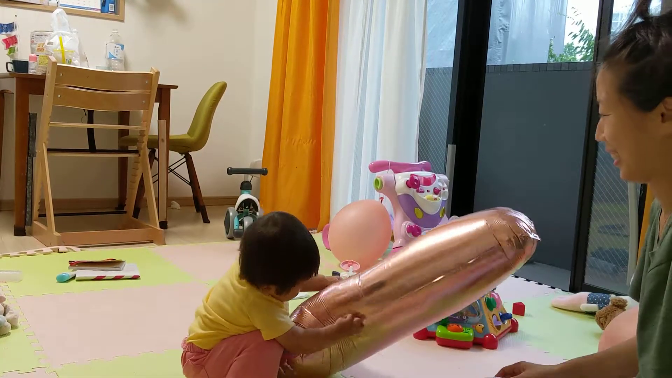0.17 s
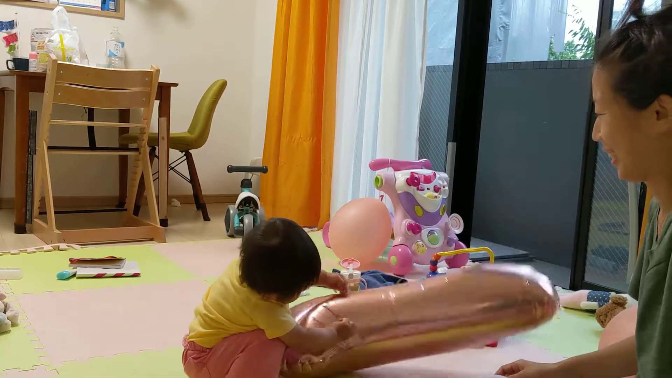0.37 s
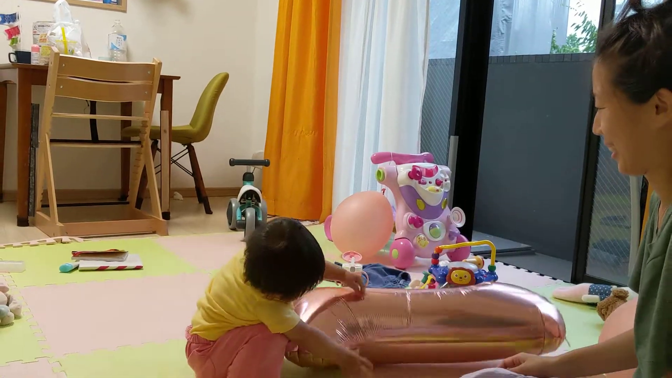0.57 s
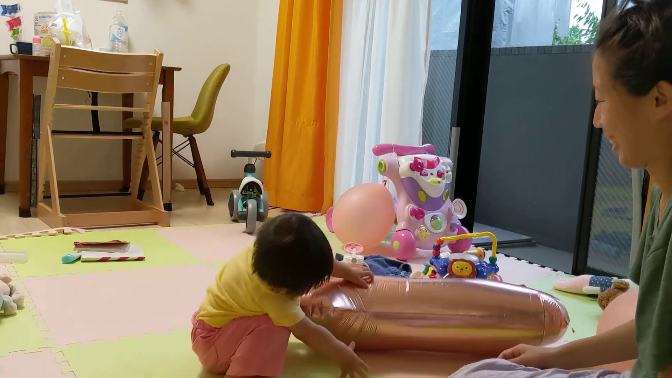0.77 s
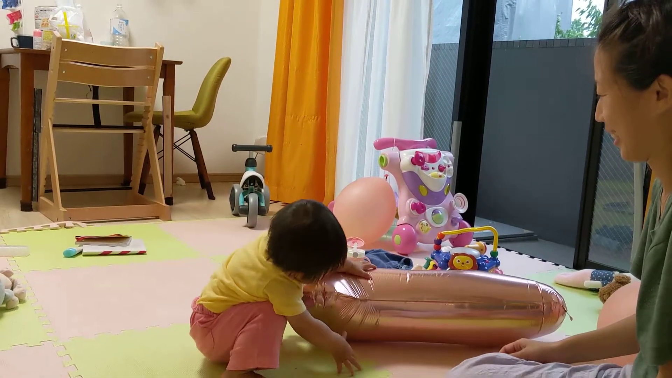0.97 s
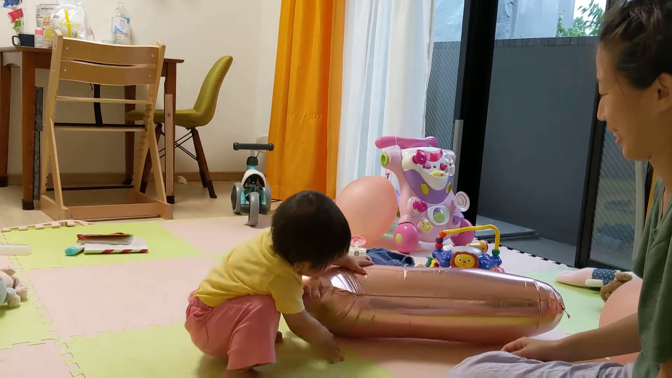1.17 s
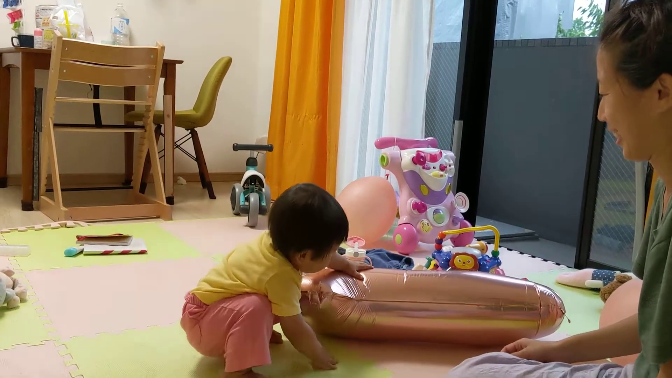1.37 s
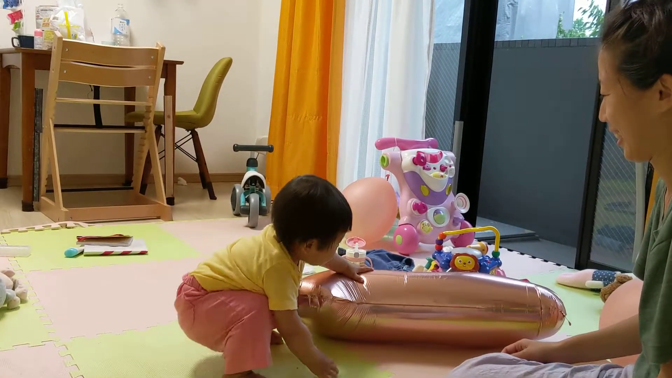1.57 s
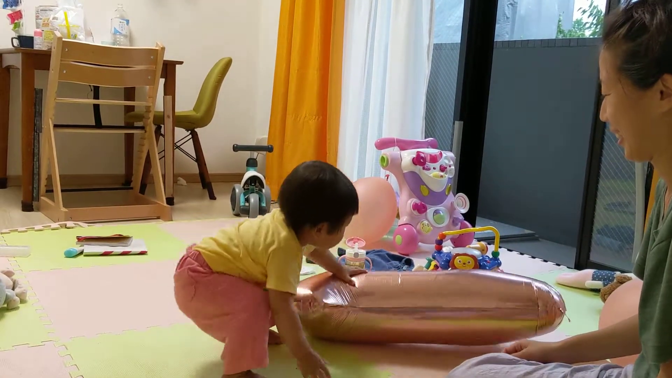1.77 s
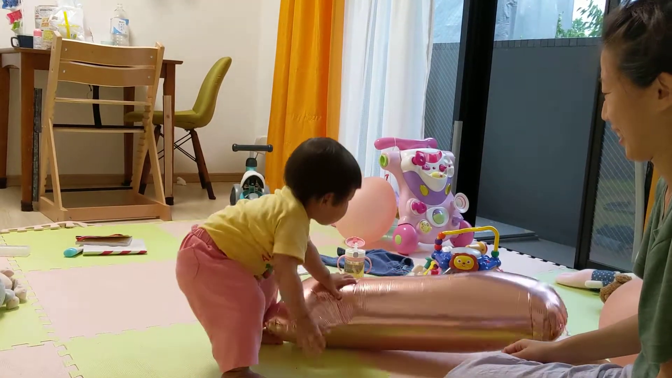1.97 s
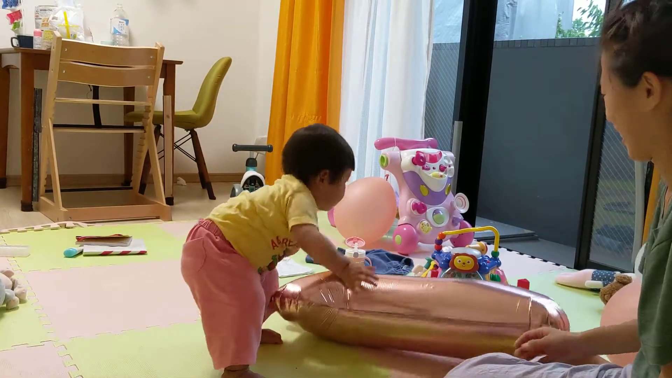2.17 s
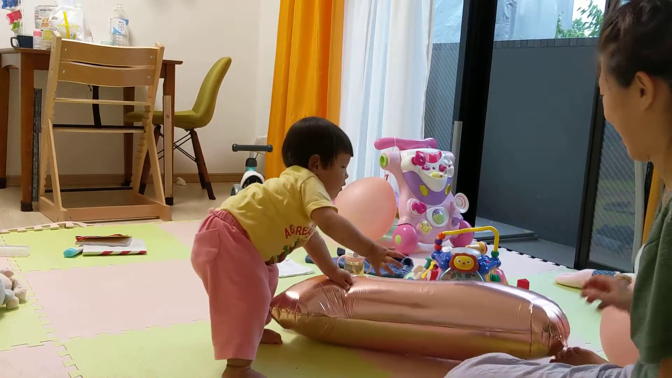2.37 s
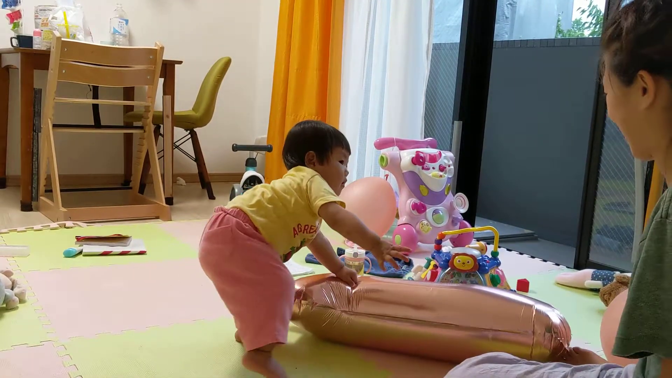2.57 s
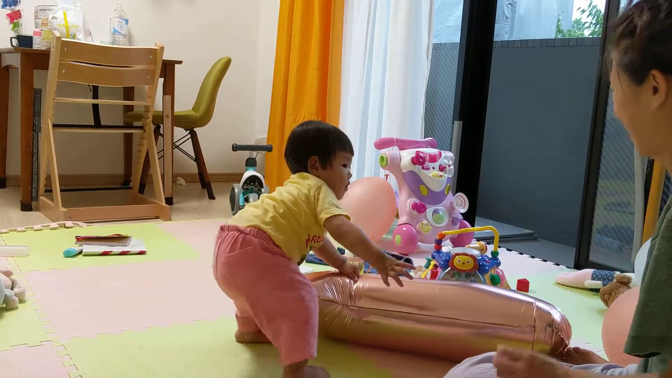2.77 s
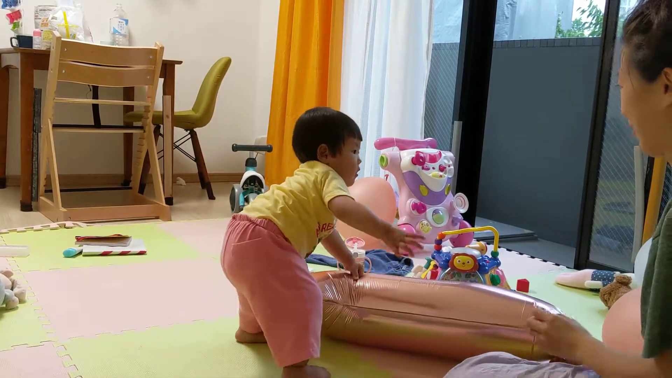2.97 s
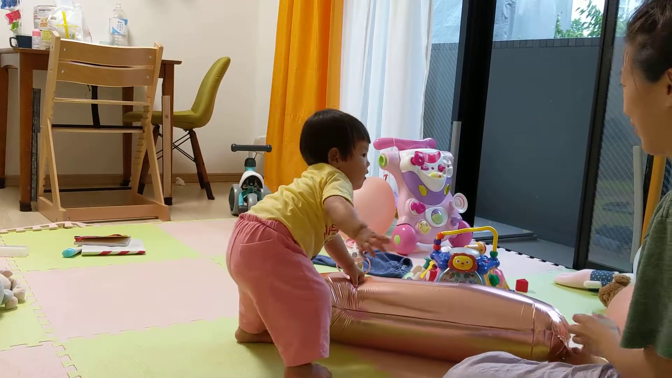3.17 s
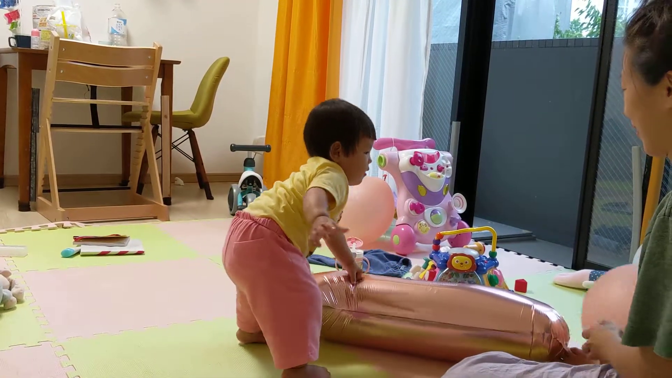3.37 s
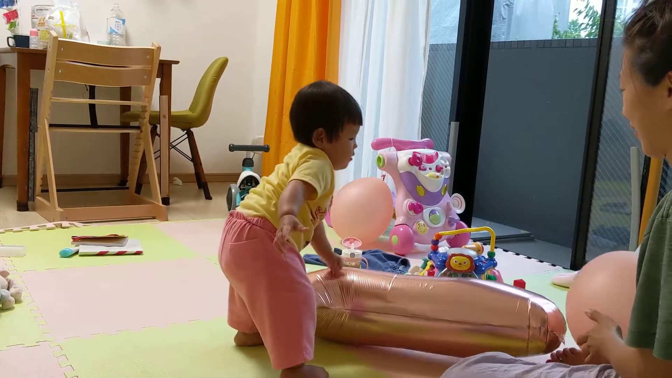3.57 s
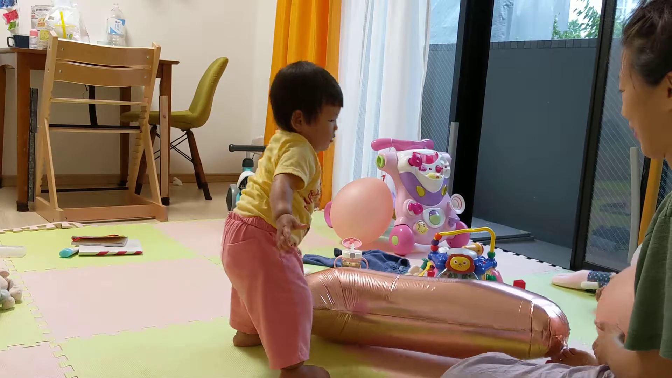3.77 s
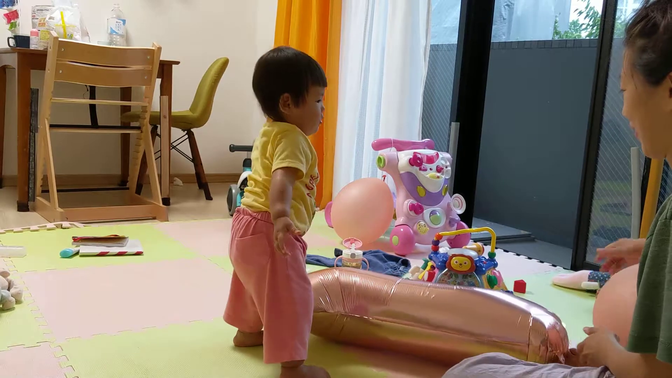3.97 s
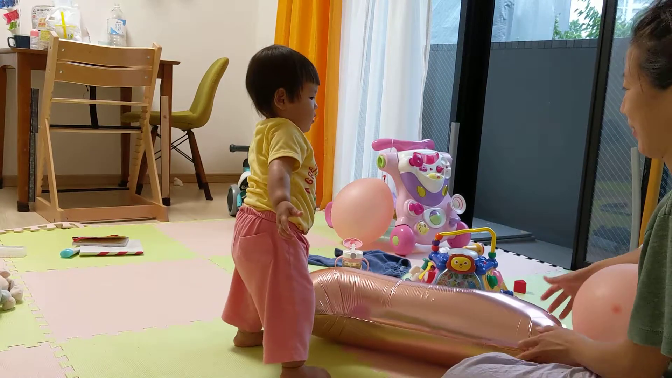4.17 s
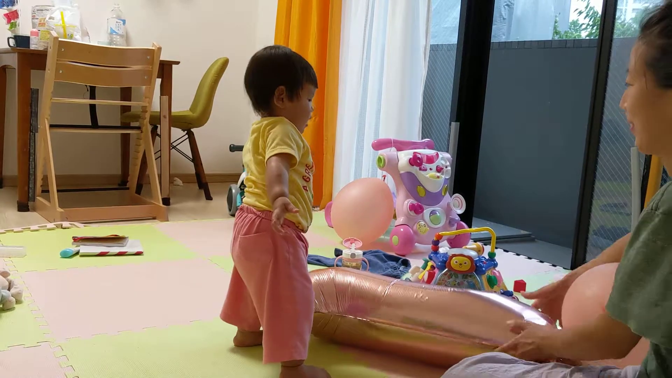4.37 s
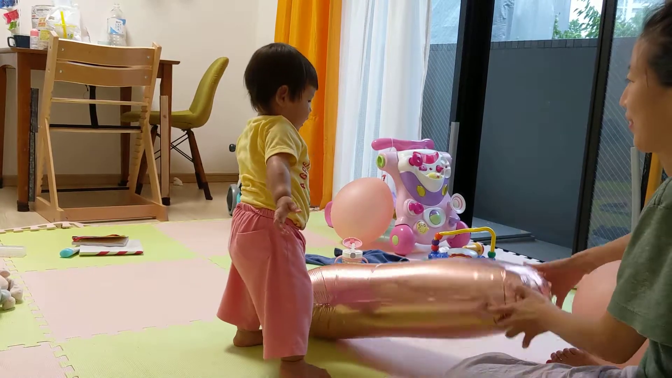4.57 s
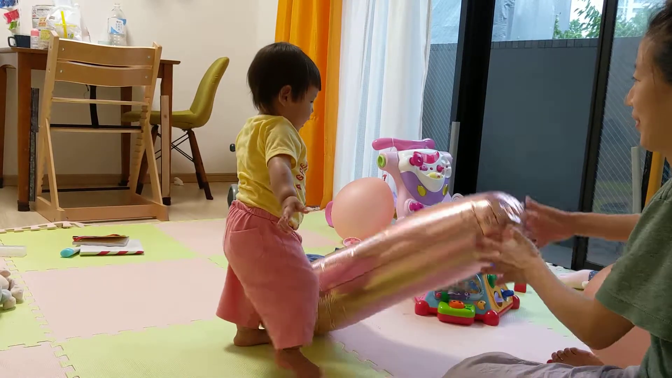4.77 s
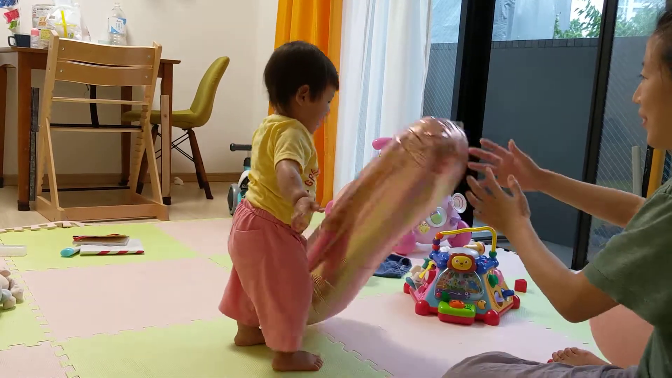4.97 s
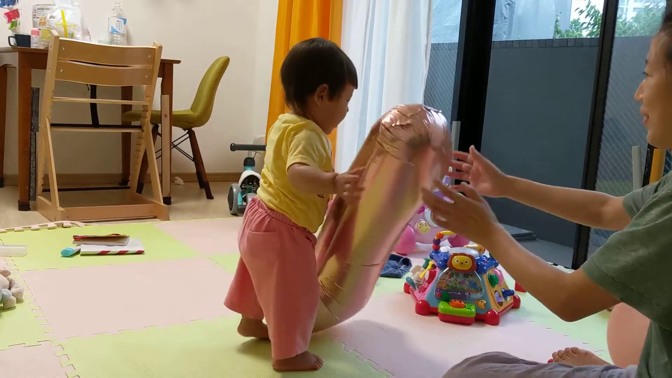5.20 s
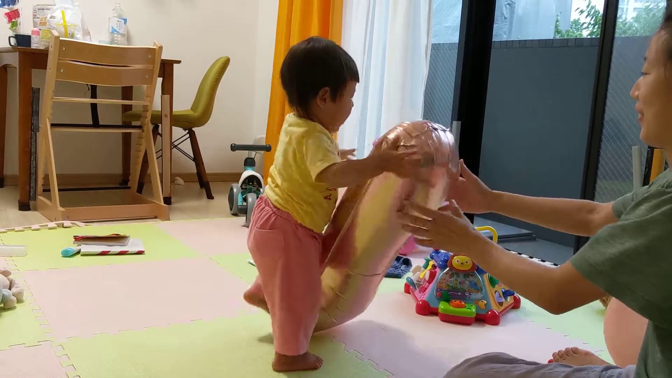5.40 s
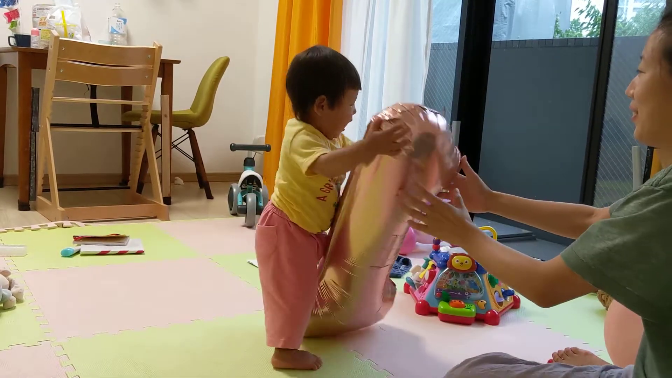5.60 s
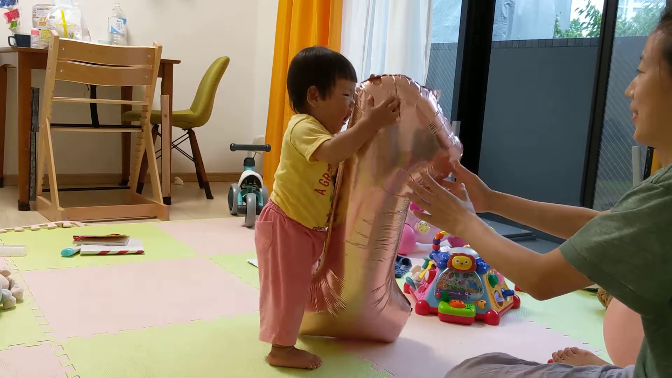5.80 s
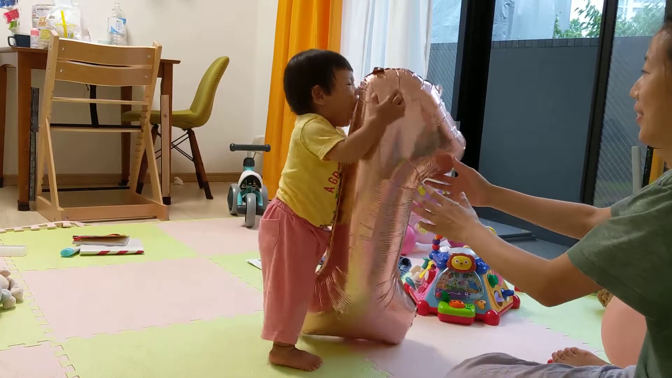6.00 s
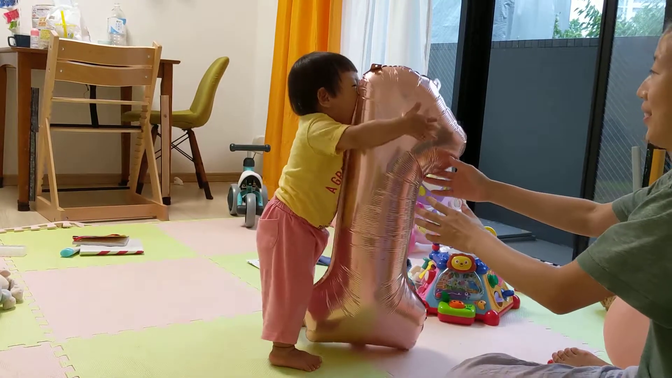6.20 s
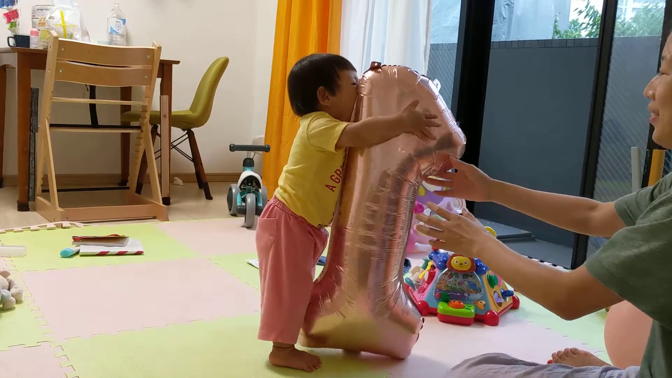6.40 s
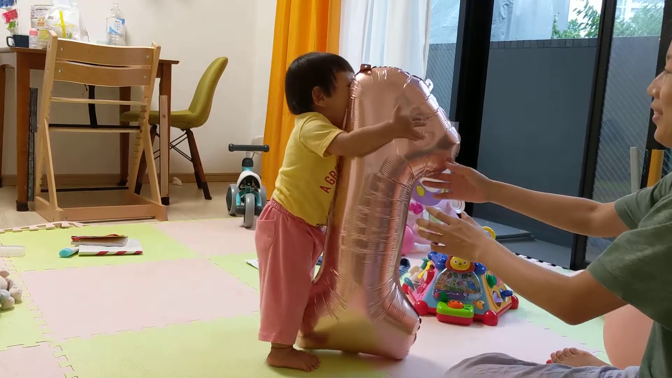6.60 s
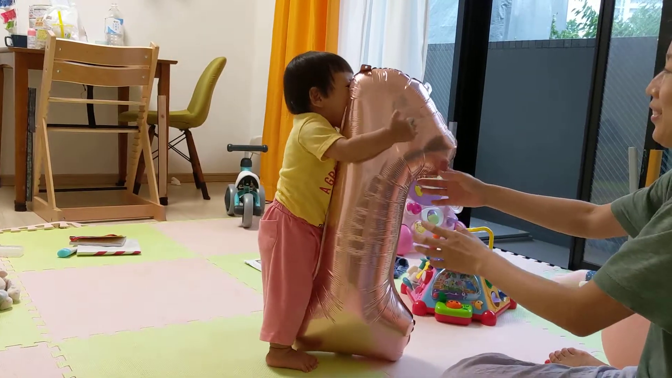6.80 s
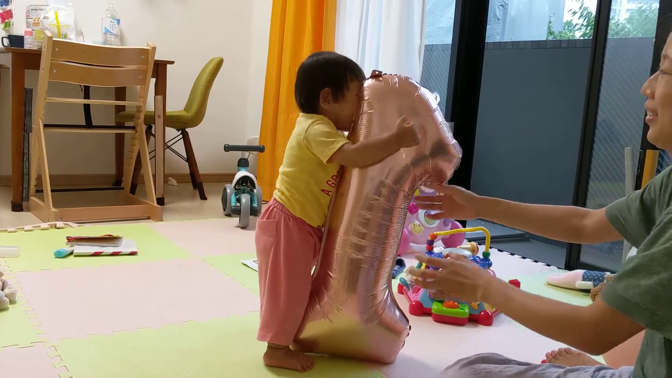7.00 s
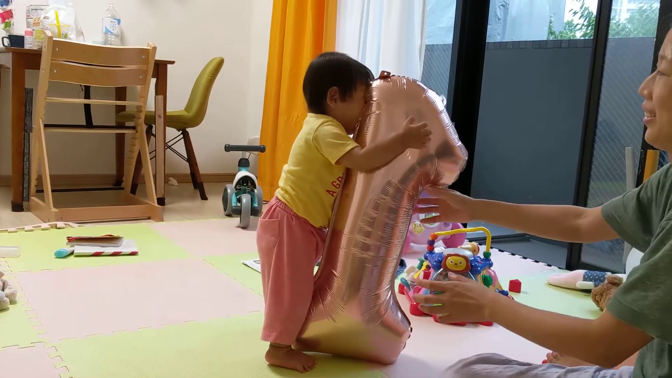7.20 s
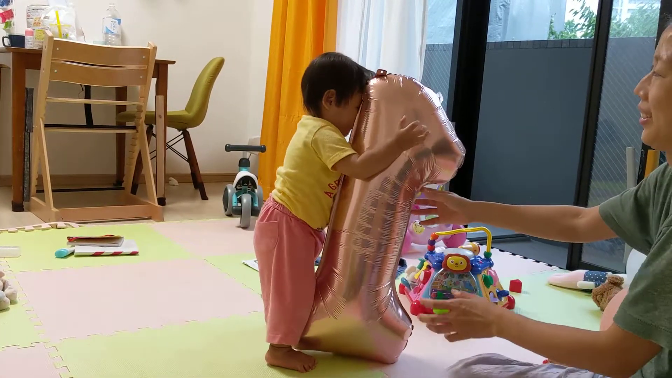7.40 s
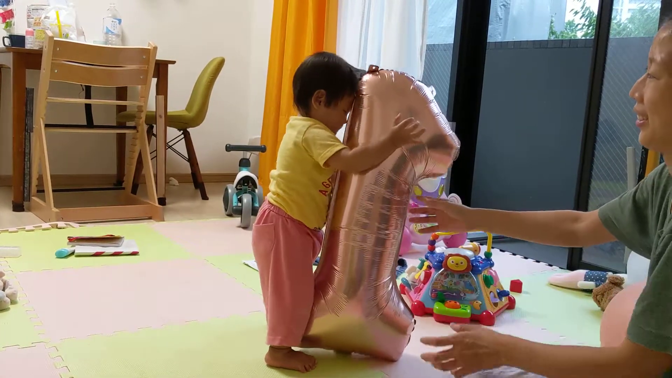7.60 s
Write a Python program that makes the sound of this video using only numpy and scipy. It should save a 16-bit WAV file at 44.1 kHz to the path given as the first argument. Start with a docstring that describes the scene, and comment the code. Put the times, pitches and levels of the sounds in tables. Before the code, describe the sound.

A large foil balloon crinkles sharply, quiets to light rustles and a soft step, then is lifted and hugged in bursts of crackling and popping dents.

```python
"""A quiet living room, with a phone about a metre from a play mat: a toddler and an adult handle a long foil balloon.
The skin crinkles in showers of tiny buckles and single creases snap: bursts of noise coloured by the foil
and by the resonances of the phone's microphone port.
Bumps boom as damped modes of the air inside, and taut dents pop as short sine bursts.
The foil squeaks once in gliding partials, and soft steps ring the modes of the floor under a faint hiss and rumble."""
import sys
import numpy as np
from scipy import signal
from scipy.fft import rfft, irfft, next_fast_len
from scipy.io import wavfile
from scipy.ndimage import uniform_filter1d

SR = 44100
rng = np.random.default_rng(int(sys.argv[2]) if len(sys.argv) > 2 else 0)


def digitize_waveform(pressure):
    """Quantize a signal to 16-bit integers and store it at the path in sys.argv[1].

    Rows of a 2-D input are taken as channels; values are limited to [-1, 1].
    """
    field = np.atleast_2d(pressure).T
    bounded = np.clip(field, -1, 1)
    quanta = np.round(bounded * 32767).astype(np.int16)
    wavfile.write(sys.argv[1], SR, quanta)


N = 337374
TIME = np.arange(N) / SR
SIZE = next_fast_len(N + SR)
FREQ = np.maximum(np.arange(SIZE // 2 + 1) * SR / SIZE, 1)


def undb(db):
    """Decibels to gain."""
    return 10 ** (np.asarray(db) / 20)


def curves(table):
    """The columns of a timed table, one value a sample."""
    times, *columns = np.transpose(table)
    return [np.interp(TIME, times, column) for column in columns]


def spectra(table):
    """The columns of a frequency table, one value a bin, straight lines over log frequency."""
    hz, *columns = np.transpose(table)
    return [np.interp(np.log(FREQ), np.log(hz), column) for column in columns]


def colour(x, gain):
    """Causal minimum-phase filter with the shape of the given magnitude; white noise keeps its power."""
    level = np.sqrt(np.mean(gain ** 2))
    cepstrum = irfft(np.log(gain / level + 1e-6), SIZE)
    # folding the cepstrum forward makes the filter causal
    cepstrum[1:SIZE // 2] *= 2
    cepstrum[SIZE // 2 + 1:] = 0
    response = np.exp(rfft(cepstrum))
    return irfft(rfft(x, SIZE) * response, SIZE)[..., :N]


def impulses(times, sizes):
    """One impulse at each time."""
    samples = np.clip(np.asarray(times) * SR, 0, N - 1).astype(int)
    return np.bincount(samples, sizes, N)


def fade(x, seconds):
    """Every impulse dies away exponentially, with this time constant."""
    return signal.lfilter([1], [1, -np.exp(-1 / (seconds * SR))], x + 1e-24)


def ring(x, hz, t60):
    """One damped mode."""
    pole = np.exp((2j * np.pi * hz - np.log(1000) / t60) / SR)
    return signal.lfilter([1], [1, -pole], x + 1e-18).imag


def walk(rate):
    """Random levels held 1 / rate s and slewed."""
    hold = int(SR / rate)
    levels = np.repeat(rng.standard_normal(N // hold + 1), hold)
    return 0.7148 * uniform_filter1d(levels, hold)[:N]


def quiet(level_db=-61.0, shared_hz=250):
    """Building rumble common to both microphones, and the hiss of each."""
    # still room and microphone hiss: [f/Hz, relative level/dB]
    room_tone = [(15, 28), (40, 26), (60, 16.5), (110, 12.5), (170, 3.5), (400, 2), (1000, 4), (1500, 5.5),
                 (2500, -0.5), (4000, 1.5), (7000, -3), (16000, -6)]
    common, *own = rfft(rng.standard_normal((3, N)), SIZE)
    shared = 1 / (1 + (FREQ / shared_hz) ** 2)
    mixed = np.sqrt(shared) * common + np.sqrt(1 - shared) * np.array(own)
    noise = irfft(mixed, SIZE)[:, :N]
    return undb(level_db) * colour(noise, undb(spectra(room_tone)[0]))


def handling(contact_body_db=-7, contact_treble_db=-0.3):
    """Middle, body and treble of the rustle in dB: each stroke swells, holds and relaxes over the light contact."""
    # light rustle between strokes, strong while the balloon is held,
    # faint while it lies or floats free: [t/s, level/dB]
    contact = [(0, -53.5), (.6, -57.5), (.8, -62.5), (1.35, -64), (1.5, -68), (1.74, -69), (2.05, -61.5),
               (2.6, -68), (3.6, -66), (3.95, -72), (4.35, -76.5), (5.25, -72), (5.95, -59.5), (6.6, -58),
               (7.65, -56.5)]
    # a hand presses, drags or grabs the foil: [t/s, attack/s, hold/s, release to fall 20 dB/s,
    # level/dB, body relative to it/dB, treble relative to it/dB]
    strokes = [(0.0, 0.001566, .012, .12, -44, -5.5, -3.5), (0.056, .005, .01, .06, -36.5, -6, -3),
               (0.09, .01, .02, .2, -47, -2, 0), (0.235, 0.0092, 0.01754, 0.3263, -57, -12, 2),
               (0.285, .06, .085, 0.0883, -52, -3, 6), (0.432, 0.03021, 0.01697, 0.1843, -48.5, -7, -5.5),
               (0.787, 0.01704, 0.05087, 0.2629, -60.5, -6, -0.5),
               (0.875, 0.02201, 0.04444, 0.1506, -56.5, -6, 0.5), (1.124, .11, .05, .08, -54, -9.5, -3),
               (1.742, 0.00493, 0.00968, 0.1307, -62, -2.5, -3.5), (1.799, .01, 0.0488, 0.4186, -61, -8, 2),
               (1.878, .022, 0.02355, .2, -52.5, -5, -2), (2.129, 0.0197, 0.1526, 0.1374, -56.5, -6.5, 2),
               (2.29, 0.00757, 0.04135, .08, -48.5, -8, 2), (2.343, 0.0092, .03, .15, -47.5, -2.5, 2),
               (2.609, 0.01958, 0.0731, 0.1638, -60.5, -2, -3.5),
               (2.761, 0.00961, 0.00486, 0.0254, -60, -6, 3),
               (2.865, 0.01223, 0.08603, .09, -61.5, 1.5, -2),
               (3.058, 0.01006, 0.0243, 0.0021, -63.5, -5.5, 6.5),
               (3.139, 0.00564, 0.0397, 0.1785, -62, -5, -2), (3.272, .035, .04, .04, -61.5, -5, 2),
               (3.423, 0.00517, .025, .13, -58.5, -6, -1), (3.548, 0.0291, 0.0477, 0.0916, -57, -4.5, -2),
               (3.726, 0.0245, 0.03186, 0.1076, -65, -7.5, 4),
               (4.108, 0.0098, 0.03487, 0.2264, -68.5, -4, -4),
               (4.384, 0.01262, 0.02033, 0.3954, -55, -11, 0.5),
               (4.44, 0.0595, 0.26635, 0.2248, -50.5, -9.5, 1.5),
               (4.79, 0.02428, .08, 0.1183, -46.5, -10.5, 0.5), (4.885, 0.04699, .03, .055, -43, -9.5, 1),
               (5.15, .05, .12, .1, -72.5, -7, 10), (5.285, .015, 0.04964, .1, -56.5, -3.5, -2),
               (5.36, 0.01432, 0.00994, .12, -53, -7.5, 3), (5.478, .02, .032, .1, -49.5, -6, 8.5),
               (5.605, .06, .09, 0.1191, -52, -6, 3), (5.759, 0.00537, .05, .115, -40.3, -6, 0.5),
               (6.007, 0.06437, .11, 0.2224, -55, -9.5, -0.5),
               (6.15, 0.02435, .04, 0.1702, -51.5, -16, 1.5), (6.243, 0.01214, .035, .05, -54, -10.5, 8),
               (6.487, 0.0266, 0.0283, 0.396, -58, -9, -4.5), (6.62, 0.08543, .08, 0.5293, -55, -8, 2),
               (6.88, 0.00912, 0.01517, 0.2675, -49, -12.5, -1),
               (6.946, 0.02854, 0.0729, 0.1319, -50, -13, -2),
               (7.059, 0.06966, 0.01993, 0.0784, -38.5, -22, -7),
               (7.177, 0.01135, 0.08241, 0.1096, -42.5, -19, -4), (7.33, .03, .1, .32, -57, -3.5, 5),
               (7.565, 0.01202, 0.071, 1.1473, -62, 1, 0)]
    contact_gains = undb([0, contact_body_db, contact_treble_db])
    power = np.outer(contact_gains, undb(curves(contact)[0])) ** 2
    for start, attack, hold, release, db, body_db, treble_db in strokes:
        # a stroke lasts 1 s at most
        span = slice(max(int(start * SR), 0), int((start + 1) * SR))
        t = TIME[span] - start
        swell = np.clip(t / attack, 0, 1)
        effort = swell * undb(-20 * np.maximum(t - attack - hold, 0) / release)
        power[:, span] += np.outer(undb([db, db + body_db, db + treble_db]), effort) ** 2
    return 10 * np.log10(power)


def crinkle(busy_rate=330, busy_db=-50, scatter_db=1.5, own_db=2.0, clump_db=1.5, shift_db=0.7233,
            presence_share=.36, grain_s=.00055, rub_share=.28):
    """Power in four bands of a shower of tiny buckles; harder handling sets off more of them, in clumps."""
    level_db, body_db, treble_db = handling()
    rate = busy_rate * undb(.5 * (level_db - busy_db))  # buckles per second; busy_rate at busy_db
    buckles = rng.random(N) < rate / SR
    energy = buckles * undb(scatter_db * np.minimum(rng.standard_exponential(N), 3.5)) ** 2
    clumps_db = clump_db * walk(50)
    presence_db = level_db + presence_share * (treble_db - level_db)
    powers = []
    for db in [body_db + 1.6483, level_db + 0.6367, presence_db - 3.0, treble_db + 0.7695]:
        own_energy = energy * undb(own_db * rng.standard_normal(N)) ** 2
        grains = fade(own_energy, grain_s)
        # dividing by the local mean leaves the level to the handling
        usual = uniform_filter1d(grains, size=3500) + 0.06465 * grains.mean()
        # the colour shifts from wrinkle to wrinkle
        db = db + clumps_db + shift_db * walk(35)
        # between the buckles the skin rubs smoothly on hands and mat
        powers.append(undb(db) ** 2 * (rub_share + (1 - rub_share) * grains / usual))
    return np.array(powers)


def foil(count=5):
    """Buckles and snaps, short noise bursts from several spots, coloured by the foil and the microphone port."""
    # overall colour of the foil: [f/Hz, relative level/dB]
    foil_colour = [(100, -16), (200, -11), (300, -3.5), (700, -4.5), (1100, 1), (2200, 0), (2800, -3.5),
                   (5000, -7.5), (8500, -6), (13000, -4), (16000, -3.5)]
    # resonances of the phone's microphone port, about 2 kHz apart: [f/Hz, width/Hz, boost/dB]
    port_resonances = [(1601.6, 544.2, 7), (3821.1, 2363.2, 11), (5688.6, 991.5, 10.5), (7467.9, 1029.7, 8),
                       (9668.9, 1357, 8), (11663, 628.8, 6.5), (13811, 1185, 3)]
    # body, middle, presence and treble bands: [low f/Hz, high f/Hz]
    band_edges = [(60, 980), (980, 2500), (2500, 5000), (5000, 19000)]
    colour_db = spectra(foil_colour)[0]
    for hz, width, db in port_resonances:
        colour_db = colour_db + db / (1 + (2 * (FREQ - hz) / width) ** 2)
    out = 0
    for power, (low, high) in zip(crinkle() + snaps(), band_edges):
        band = 1 / np.sqrt((1 + (low / FREQ) ** 12) * (1 + (FREQ / high) ** 12))
        bursts = np.sqrt(np.abs(power) / count) * rng.standard_normal((count, N))
        out = out + colour(bursts, undb(colour_db) * band)
    return out


def body(boom_db=-1, focus_db=7):
    """A bump rings the air in the balloon, most of all the modes near its own pitch."""
    # bumps against the inflated body: [t/s, relative level/dB, f it booms around/Hz]
    bumps = [(0.057, -35, 275.8), (0.345, -47.5, 260.8), (1.255, -52.5, 279.6), (1.748, -50.5, 479.3),
             (1.893, -45.5, 275.2), (2.197, -50.5, 380.5), (2.628, -55, 307), (2.691, -47.5, 293),
             (2.884, -52.5, 274.9), (2.948, -43.5, 151), (4.117, -49, 151.2), (5.762, -41, 448),
             (6.73, -49, 285.1), (7.52, -51, 215), (7.584, -49.5, 268.5)]
    # air and skin of the body: [f/Hz, relative level/dB, t60/s]
    body_modes = [(185.65, -9.5, 0.16025), (221.09, -9.5, 0.1359), (266.06, 0.5, 0.08736),
                  (333.84, 4, 0.06756), (394.16, -0.5, 0.12715), (464.13, 2.5, 0.1052),
                  (553.8, -9.5, 0.0598)]
    times, db, centre_hz = np.transpose(bumps)
    signs = np.sign(rng.standard_normal((len(times), len(body_modes)))).T
    out = 0
    for sign, (hz, mode_db, t60) in zip(signs, body_modes):
        off_pitch_db = focus_db * np.abs(np.log2(hz / centre_hz))  # focus_db per octave
        sizes = sign * undb(db + boom_db + mode_db - off_pitch_db)
        out = out + ring(impulses(times, sizes), hz, t60)
    return out


def dent(hz, db, swell_s):
    """A popping dent is a sine burst at its own pitch that peaks after swell_s and dies away."""
    t = TIME[:SR // 40]
    swell = t / swell_s * np.exp(1 - t / swell_s)
    return undb(db) * swell * np.sin(2 * np.pi * hz * t)


def pops(swell_s=0.0011, pop_db=-5.5, small_s=.0004, small_db=-30, spread_db=8,
         low_hz=2600, high_hz=4400, count=24):
    """The large dents pop one by one; small, brief ones pop at random among them during the hug."""
    # dents that pop in tightly stretched skin and ring: [t/s, f/Hz, relative level/dB]
    large_dents = [(0.063, 2350, -22), (0.069, 1750, -23), (3.355, 2491, -33), (3.422, 5000, -36),
                   (6.55, 1627, -30), (6.792, 1784, -26), (6.902, 1495, -28.5), (7.068, 4030, -20.5),
                   (7.102, 1459, -22), (7.118, 1515, -19), (7.1222, 1548, -16.5), (7.1275, 3471, -19),
                   (7.136, 1478, -17.5), (7.149, 1506, -22.5), (7.184, 3434, -23), (7.19, 1473, -23),
                   (7.203, 2547, -24.5), (7.211, 3754, -22), (7.227, 1437, -24.5), (7.27, 1457, -22.5)]
    # the hug stretches the skin, with a flurry of small, high dents meanwhile: [from t/s, to t/s]
    hug_start, hug_end = (7.11, 7.29)
    sounds = [(start, dent(hz, db + pop_db, swell_s)) for start, hz, db in large_dents]
    for when, pitch, size in rng.random((count, 3)):
        start = hug_start + when * (hug_end - hug_start)
        hz = low_hz * (high_hz / low_hz) ** pitch
        sounds.append((start, dent(hz, small_db + spread_db * (size - .5), small_s)))
    out = np.zeros(N + SR)
    for start, sound in sounds:
        first = int(start * SR)
        out[first:first + len(sound)] += sound
    return out[:N]


def snaps(settle_s=0.007683, settle_db=-21, body_db=1, middle_db=8.2, presence_db=8, treble_db=14.6,
          rise_s=.0002, snap_s=.0008):
    """Power in four bands of creases that flip over, dull or bright; the skin around each settles for a moment."""
    # creases that snap: [t/s, relative level/dB, treble relative to it/dB]
    creases = [(0.0641, -31, -5.5), (0.0885, -46, 5), (0.2467, -45.5, -11), (0.3054, -44.5, -2),
               (1.259, -56, -5), (1.7509, -49, -12), (1.8037, -62.5, 5.5), (1.8968, -49, -11.5),
               (1.915, -56.5, 10), (2.133, -48, -1.5), (2.154, -48, -8), (2.2024, -47, -10.5),
               (2.2993, -45, -4), (2.458, -65, 13), (2.5163, -60, 7), (2.6188, -50.5, -12),
               (2.6928, -48.5, -12.5), (2.7596, -42.5, -9), (2.7757, -59, 7.5), (2.869, -56.5, -0.5),
               (3.1036, -53.5, -5), (3.1453, -47, -8), (3.3566, -49.5, -3), (3.4212, -45, -7.5),
               (3.569, -51.5, -5), (3.6199, -47.5, -9), (4.119, -55, -12), (4.216, -61.5, 2),
               (4.396, -54.5, -5), (4.7301, -39, -19.5), (4.811, -40, -15.5), (4.8355, -33.5, -15),
               (4.9386, -37.5, -3.5), (5.4507, -54, 1), (5.7655, -36.5, -8.5), (5.8189, -39, -2),
               (6.0022, -59, 5), (6.184, -42, -12), (6.3423, -52, -7.5), (6.4414, -52, -2),
               (6.4995, -55, 2.5), (6.5485, -46.5, -4.5), (6.8966, -42.5, -4), (7.0689, -37, -6.5),
               (7.1264, -33, -9), (7.1917, -44, -2.5), (7.373, -51.5, 3.5), (7.5085, -47, -7),
               (7.6108, -46.5, -1.5)]
    times, level_db, bright_db = np.transpose(creases)
    powers = []
    for db in [body_db, middle_db, presence_db + bright_db / 2, treble_db + bright_db]:
        hits = impulses(times, undb(level_db + db) ** 2)
        flips = fade(hits, rise_s) / (rise_s * SR)
        settling = undb(settle_db) ** 2 * fade(flips, settle_s)
        powers.append(fade(flips, snap_s) + settling)
    return np.array(powers)


def steps(thud_db=5.5, roll_s=0.022212, count=4):
    """A foot rolls onto the mat in soft pushes that ring the floor; a harder one brings out its upper modes."""
    # steps and shifts of weight on the floor: [t/s, relative level/dB, hardness/dB per octave]
    footfalls = [(0.075, -58.5, 7), (0.35, -59, 3.5), (0.525, -63, 6), (1.279, -60.5, -6.5),
                 (1.476, -74.5, 10.5), (2.786, -46.5, -4.5), (2.891, -52.5, 4), (3.222, -60, 2),
                 (3.5, -58, 0.5), (4.125, -62.5, 8), (4.738, -61.5, -18.5), (5.306, -64.5, 10),
                 (5.48, -57.5, -0.5), (5.68, -53, -13.5), (5.764, -48.5, -0.5), (6.994, -60.5, 8),
                 (7.498, -64.5, 8)]
    # floor: [f/Hz, relative level/dB, t60/s]
    floor_modes = [(40.298, -2.5, 0.6983), (78.39, -5.5, 0.2304), (106.43, -5.5, 0.2574),
                   (139.14, -13, 0.1331)]
    times, db, hard_db = np.transpose(footfalls)
    chance = rng.random((len(times), count))
    delays = roll_s * (np.arange(count) + (chance - .5) / 2)
    push_times = (times[:, None] + delays).ravel()
    push_sizes = np.exp(-np.arange(count) / 2)
    out = 0
    for hz, mode_db, t60 in floor_modes:
        octaves = np.log2(hz / floor_modes[0][0])
        sizes = np.outer(undb(db + thud_db + mode_db + hard_db * octaves), push_sizes)
        out = out + ring(impulses(push_times, sizes.ravel()), hz, t60)
    # a 5 ms window softens every push
    sole = np.hanning(SR // 200)
    return signal.fftconvolve(out, sole / sole.sum())[:N]


def squeak():
    """A thin arching whistle as the foil sticks and slips under a finger."""
    # the slip, heard only through its partials: [t/s, base f/Hz, level/dB]
    slip = [(3.55, 2250, -66), (3.575, 2280, -59), (3.6, 2320, -54), (3.625, 2285, -57), (3.645, 2200, -68)]
    # its partials: [multiple of the base f, relative level/dB]
    partials = [(4.04, -9), (5, 0), (5.89, -3)]
    hz, db = curves(slip)
    wavering_hz = hz * (1 + .002 * walk(400))
    phase = 2 * np.pi * np.cumsum(wavering_hz) / SR
    sounding = (TIME > slip[0][0]) & (TIME < slip[-1][0])
    return sounding * sum(undb(db + partial_db) * np.sin(k * phase) for k, partial_db in partials)


def room(x, wet_db=0.1169, t60_low=0.32112, t60_high=0.31206, build_s=0.00222, shadow_db=-5):
    """One spot heard by two microphones: its own path lag, and a diffuse tail whose treble dies sooner."""
    t = TIME[:SR // 2]
    noise = rng.standard_normal((2, len(t)))
    low = signal.sosfilt(signal.butter(1, 4000, fs=SR, output="sos"), noise)
    low_tail = low * np.exp(-np.log(1000) * t / t60_low)
    high_tail = (noise - low) * np.exp(-np.log(1000) * t / t60_high)
    echoes = low_tail + high_tail
    echoes *= 1 - np.exp(-(t / build_s) ** 2)
    echoes *= undb(wet_db) / np.linalg.norm(echoes, axis=1, keepdims=True)
    # the direct sound; the phone shades it from the right port, which hears more of the walls instead
    echoes[[0, 1], [0, rng.integers(0, 20)]] += [1, undb(shadow_db)]
    echoes[1] *= np.linalg.norm(echoes[0]) / np.linalg.norm(echoes[1])
    return signal.oaconvolve(x[None], echoes, axes=1)[:, :N]


def microphones(pair):
    """The right port faces away: it hears the lows shifted in phase and little of the treble."""
    # right microphone against the left: [f/Hz, relative level/dB, phase lead/rad, coherence 0-1]
    right_port = [(40, -3.5, .5, .95), (150, -5, 1.4, .95), (430, -5.3, 2.2, .995), (800, -8, 1.7, .97),
                  (1300, -11, 0, .83), (1800, -11.8, .3, .62), (2550, -19, 0, .15), (3700, -11.3, 0, .15),
                  (4400, -16.5, 0, .1), (5500, -25, 0, 0), (9000, -28, 0, 0), (16000, -26, 0, 0)]
    db, lead, likeness = spectra(right_port)
    likeness = np.clip(likeness, 0, 1)
    left, other = rfft(pair, SIZE)
    mixed = likeness * left + np.sqrt(1 - likeness ** 2) * other
    right = mixed * undb(db) * np.exp(1j * lead)
    return np.array([pair[0], irfft(right, SIZE)[:N]])


def scene():
    """Every spot of the balloon reaches the microphones by its own paths; the steps come through the floor."""
    skin = sum(room(spot) for spot in foil())
    ringing = room(pops() + body() + squeak(), wet_db=-2.5)
    return microphones(skin + ringing + steps()) + quiet()


def record(dry, top_hz=15850):
    """The phone cuts the top with a steep low-pass."""
    return signal.sosfilt(signal.ellip(12, .1, 80, top_hz, fs=SR, output="sos"), dry)


dry = scene()
out = record(dry)
digitize_waveform(out)
```